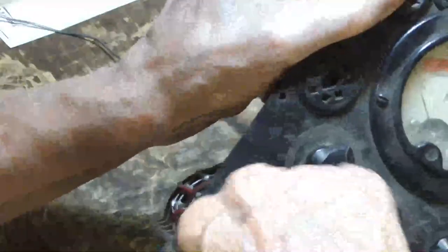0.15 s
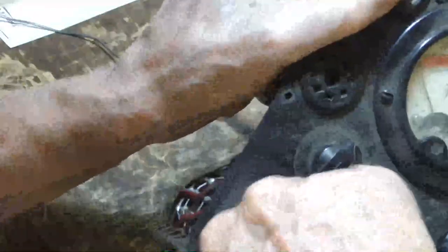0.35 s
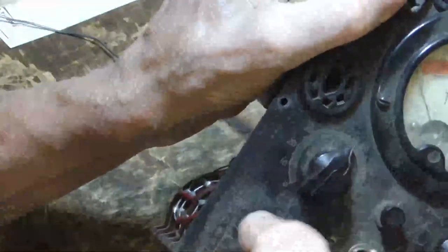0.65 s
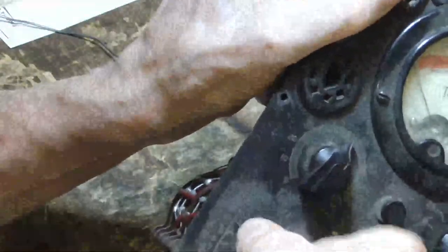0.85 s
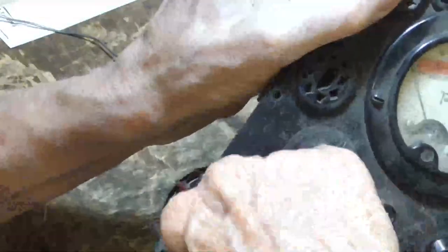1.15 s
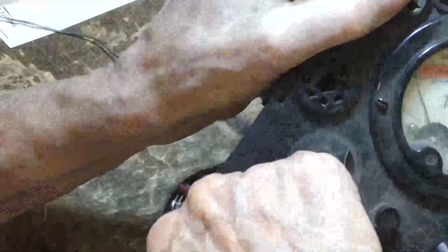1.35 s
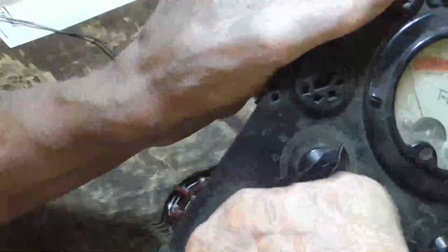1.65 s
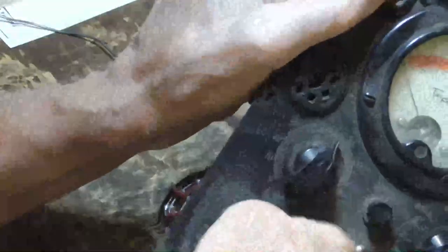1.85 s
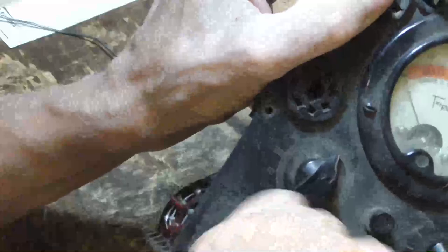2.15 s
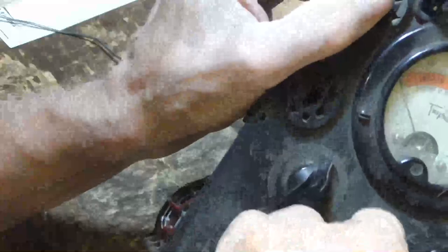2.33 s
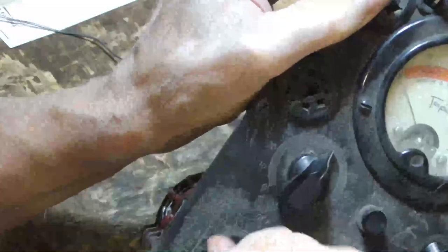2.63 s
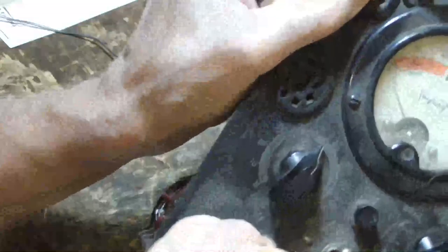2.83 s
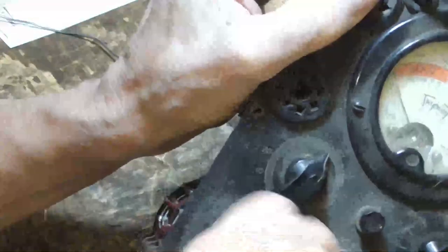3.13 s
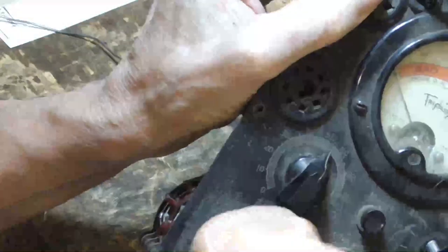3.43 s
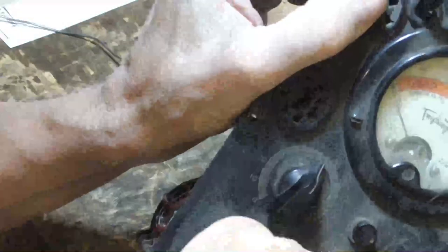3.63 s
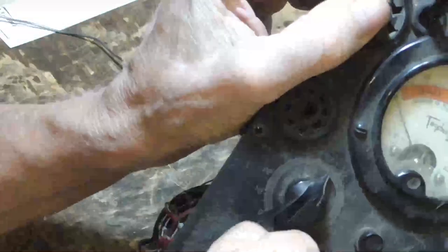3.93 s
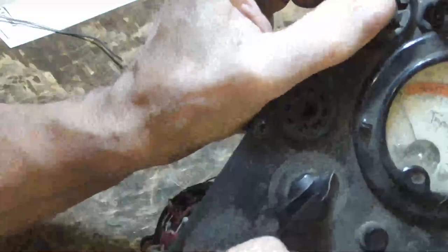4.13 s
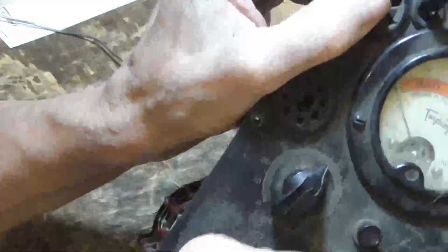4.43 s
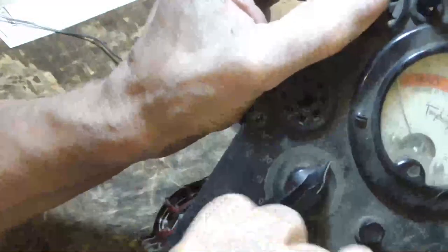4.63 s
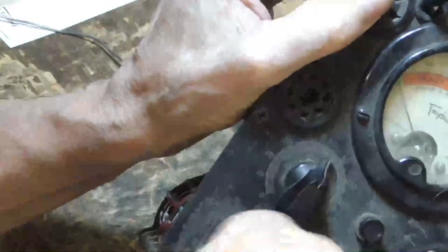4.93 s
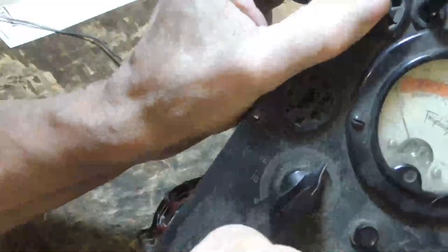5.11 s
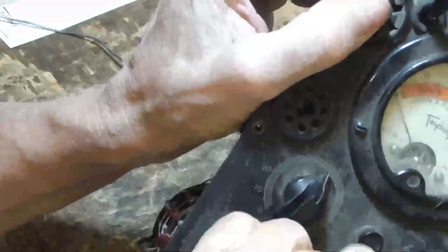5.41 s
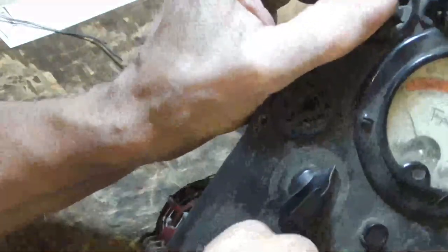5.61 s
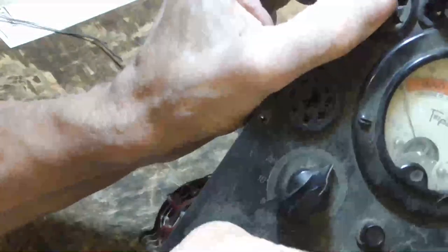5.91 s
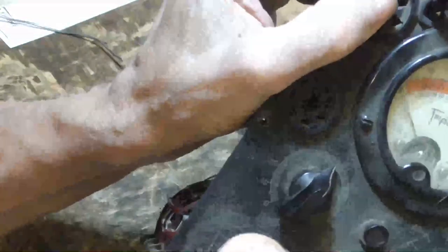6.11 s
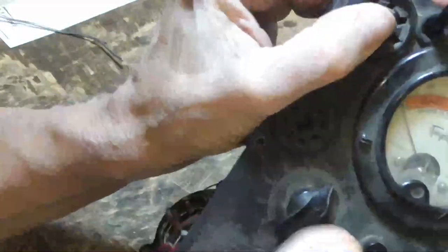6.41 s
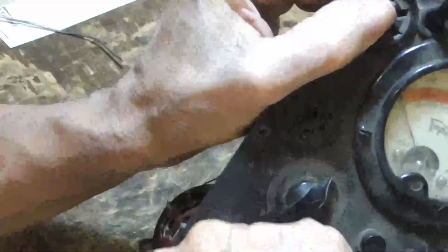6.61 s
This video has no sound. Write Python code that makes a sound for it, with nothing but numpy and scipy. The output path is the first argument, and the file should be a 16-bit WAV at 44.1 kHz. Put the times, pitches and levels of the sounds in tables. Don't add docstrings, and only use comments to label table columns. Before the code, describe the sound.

A stiff rotary switch is spun in nine short bursts of bright metallic clicks, over a steady low motor hum and soft air rush.

```python
import sys
import numpy as np
from scipy import signal
from scipy.fft import rfft, irfft, next_fast_len
from scipy.io import wavfile
from scipy.ndimage import uniform_filter1d, map_coordinates

SR = 44100
rng = np.random.default_rng(int(sys.argv[2]) if len(sys.argv) > 2 else 0)


def waveform_to_disk(signal):
    frames = np.transpose(np.atleast_2d(signal))
    scaled = np.clip(frames, -1, 1) * 32767
    samples = np.round(scaled).astype(np.int16)
    wavfile.write(sys.argv[1], SR, samples)


def nominal_scale(level):
    x = np.asarray(level, float) / 20
    return 10 ** x


N = 298116


def unit(x):
    return x / np.sqrt(np.mean(x ** 2) + 1e-20)


def along(points, hz):
    f, value = np.transpose(points)
    return np.interp(np.log(hz + 1), np.log(f + 1), value)


def wobble(rate):
    coarse = np.arange(0, N + 64, 64)
    knots = rng.standard_normal(int(N * 40 / SR))
    curve = map_coordinates(knots, [coarse * min(rate, 30) / SR])
    return np.interp(np.arange(N), coarse, curve)


def filtered(x, response):
    m = next_fast_len(N + SR // 2)
    hz = np.fft.rfftfreq(m, 1 / SR)
    return irfft(rfft(x, m) * response(hz), m)[..., :N]


def modes(table, scatter_db=0):
    gains = nominal_scale(np.transpose(table)[2] + scatter_db * rng.standard_normal(len(table)))

    def response(hz):
        total = 0
        for k, (centre, width, _) in enumerate(table):
            damping = 1j * hz * width
            total = total + (-1) ** k * gains[k] * damping / (centre ** 2 - hz ** 2 + damping)
        return total

    return response


SHAFT_HZ = 57.74
# multiple, level_db
HUM = [(1, -58.5), (2.06, -57), (3, -44), (4, -41), (5, -57.5), (6, -48.5), (7, -57.5), (8, -57), (9, -64),
       (11, -57.5), (13, -60), (16, -53.5), (18, -57), (21.8, -57)]
# time_s, level_db
FOURTH = [
    (0.0, -44),
    (0.43, -39.5),
    (2.01, -41.5),
    (2.65, -44),
    (5.08, -44),
    (5.55, -42.5),
    (5.78, -47),
    (6.76, -44),
]


def motor():
    t = np.arange(N) / SR
    lines = []
    for k, db in HUM:
        strength = nominal_scale(db + 2.0 + (1.37 + 0.078 * k) * wobble(12))
        drift = 0.037 * k * wobble(8) + 0.0034 * k * k * wobble(25)
        start_phase = 7 * rng.random()
        lines.append(strength * np.sin(2 * np.pi * SHAFT_HZ * k * t + drift + start_phase))
    s, db = np.transpose(FOURTH)
    lines[3] = lines[3] * nominal_scale(np.interp(t, s, db - np.mean(db)))
    return sum(lines) * nominal_scale([[-.3], [.3]])


AIR_DB = -35
# pitch_hz, level_db (per Hz)
AIR = [(30, -30), (90, -15.5), (130, -12), (200, -2), (300, 0.5), (430, -9), (800, -5.5), (1300, -13),
       (1500, -18), (1800, -25.5), (2800, -31), (4800, -33), (6300, -39.5), (8000, -33.5), (15500, -47.5)]
# pitch_hz, likeness (0 to 1)
ALIKE = [(60, 0.43), (130, 0.99), (290, 0.9), (640, 0.75), (1410, 0.56), (3100, 0.42), (6820, 0.33),
         (15000, 0.04)]


def air():
    def shared_and_opposed(hz):
        angle = np.arccos(np.clip(along(ALIKE, hz), -1, 1)) / 2
        return nominal_scale(along(AIR, hz)) * [np.cos(angle), np.sin(angle)]

    shared, opposed = filtered(rng.standard_normal((2, N)), shared_and_opposed)
    level = nominal_scale(AIR_DB - 4 + 0.67 * wobble(3.05))
    return level * unit(np.array([shared + opposed, shared - opposed]))


# time_s (when the ball lands), level_db,
# lead_in_ms (slip before the landing), chatter_ms
TURN_1 = [(0.0487, -14, 3.8, 1.4), (0.0931, -24.0, 1.5, 1.9), (0.1048, -21, 1.8, 4.3),
          (0.1394, -15.5, 1.5, 1.9), (0.1537, -21, 1.3, 6.9), (0.1634, -16, 1.3, 1.0),
          (0.175, -11, 0.69, 1.7), (0.1919, -22, 1.5, 3.3), (0.2102, -21, 2.8, 7.0),
          (0.2147, -24, 3.9, 2.3), (0.2318, -28, 1.9, 1.1), (0.2383, -15.5, 1.4, 2),
          (0.2647, -36, 2.7, 6.3), (0.2779, -15, 1.5, 2.2), (0.3165, -45, 2.7, 5.7),
          (0.3525, -27, 1.7, 1.3), (0.372, -17.5, 1.8, 3.2)]
TURN_2 = [(0.9651, -22.5, 1.7, 2.2), (0.969, -16.0, 1.0, 3.8), (0.9997, -34, 3.1, 6.7),
          (1.0104, -16.5, 1.7, 4.1), (1.0644, -15, 2.1, 2.1), (1.09, -20.0, 2.9, 3.6),
          (1.1088, -21, 0.87, 1.2), (1.1132, -18.0, 2.7, 1.7), (1.1332, -25, 1.7, 3.4),
          (1.139, -18, 0.9, 1.4), (1.1656, -27, 3.4, 4.1), (1.1768, -19.5, 1.5, 2), (1.2001, -24, 1, 1.8),
          (1.211, -19.5, 1, 2.7), (1.2309, -28.5, 1.3, 2.1), (1.2429, -19, 0.8, 1.6),
          (1.313, -39, 1.2, 3.6), (1.3336, -25.5, 0.9, 3.5)]
TURN_3 = [(1.7715, -29, 2, 3.6), (1.7805, -23.5, 0.9, 5.8), (1.8086, -33, 3.8, 6.2),
          (1.8222, -30, 3.9, 5.0), (1.8446, -30, 2.7, 5.7), (1.8567, -26.5, 1.2, 4.6),
          (1.874, -24.5, 4.5, 1.0), (1.8802, -22.5, 1.9, 8), (1.8981, -21.5, 3.3, 5.6),
          (1.9107, -19.5, 1.3, 6.7), (1.929, -19, 5.0, 3.2), (1.9464, -18.5, 5, 2.3),
          (1.9725, -24, 2.3, 2.6)]
TURN_4 = [(2.6513, -45, 2.8, 5.1), (2.6638, -11.5, 1.8, 2.2), (2.684, -19, 0.7, 2.6),
          (2.7213, -13, 0.9, 1.4), (2.751, -38, 3.1, 4.1), (2.764, -17, 1.6, 3), (2.7948, -18, 1.1, 4.1),
          (2.8077, -33, 3.1, 1.0), (2.8224, -15, 0.9, 2), (2.85, -23.5, 5, 7.0), (2.869, -19.5, 1.4, 3.4),
          (2.8892, -20.5, 2.4, 6.9), (2.9133, -20, 1.2, 3)]
TURN_5 = [(3.3993, -14.5, 1.6, 1.5), (3.4297, -25, 5.4, 6.3), (3.476, -37, 3.1, 1.0),
          (3.483, -25, 1.0, 3.3), (3.5046, -36, 2.2, 5.7), (3.5148, -21, 1.3, 1.6), (3.5333, -35, 3.3, 6.5),
          (3.5376, -34, 2.9, 1.9), (3.5421, -28, 3.5, 6.2), (3.5616, -38, 3.1, 1.0),
          (3.5677, -23, 1.8, 4.6), (3.5874, -26, 3.1, 3.6), (3.6056, -21, 3.9, 1.5),
          (3.6217, -23.5, 3.8, 5.8), (3.6423, -23.5, 4, 3.0), (3.6807, -25, 0.8, 1.3)]
TURN_6 = [
    (4.2094, -12, 0.9, 1.6),
    (4.2389, -19, 1.1, 3.8),
    (4.27, -16.5, 1.4, 1.8),
    (4.3022, -19, 1.9, 2.1),
    (4.3166, -32, 3.1, 6.4),
    (4.3263, -18.5, 0.95, 3.2),
    (4.3446, -19, 1.2, 3.3),
    (4.3564, -20.5, 5.0, 2.9),
    (4.372, -16.5, 1.2, 2.8),
    (4.3899, -20, 0.92, 5.5),
]
TURN_7 = [(4.8847, -15.5, 1.2, 2.2), (4.9085, -27, 3.4, 1.0), (4.9142, -22.5, 2.8, 3.9),
          (4.939, -34, 2.6, 1.0), (4.9426, -27, 3.1, 1.0), (4.9503, -25.5, 1.2, 4.2),
          (4.9839, -32, 3.1, 3.0), (4.992, -20, 1.4, 1.1), (5.0168, -15, 1.3, 1.7), (5.0364, -20, 4.3, 3.1),
          (5.0539, -17.5, 3.4, 2.5), (5.069, -21.5, 5.4, 5.2), (5.0863, -14.5, 0.9, 2.4),
          (5.106, -20, 1.2, 3.4), (5.146, -24.5, 1.5, 2.6)]
TURN_8 = [(5.6903, -14.0, 1.3, 2.7), (5.719, -15.5, 1.4, 2.8), (5.7628, -15.5, 1.3, 1.6),
          (5.8045, -17.5, 0.8, 4.5), (5.829, -43, 3.1, 5.9), (5.8404, -14.5, 1.7, 1.2),
          (5.8804, -20, 0.9, 2.2), (5.9045, -35, 2.8, 0.89), (5.916, -15.5, 1, 1.6),
          (5.9497, -19.5, 1.3, 3.7), (5.9823, -21, 1.9, 3.1), (6.017, -21, 1.4, 3.9)]
TURN_9 = [(6.4658, -14, 3.3, 1.6), (6.4871, -26, 3.1, 1.0), (6.4956, -23.5, 3.5, 1.2),
          (6.522, -26.5, 1.3, 3.9), (6.5309, -22.5, 1.2, 3.1), (6.5537, -30, 4.2, 6.2),
          (6.5659, -17, 0.84, 1.7), (6.581, -17, 1.5, 4.1), (6.5951, -17, 1.0, 6.4),
          (6.6137, -18.5, 5.0, 3.1), (6.6278, -20, 4.4, 5), (6.651, -18.5, 3.8, 4.4)]
TURNS = [TURN_1, TURN_2, TURN_3, TURN_4, TURN_5, TURN_6, TURN_7, TURN_8, TURN_9]
# time_s, rocking_db, boom_db, scrape_db, panel_freedom_db (how freely it rings)
TWISTS = [
    (.16, -40, -37.5, -46, -2.5),
    (1.24, -36.5, -37, -56, -2),
    (1.94, -40, -34.5, -31, 1),
    (2.9, -39, -35, -33.5, 0.1),
    (3.6, -39, -34.5, -28, 2),
    (4.35, -44, -49, -37, -0.7),
    (5.05, -43, -33, -24.5, .3),
    (5.93, -49, -49, -38, 1),
    (6.6, -35, -42, -42, -0.2),
]


def snaps():
    return np.array([(*row, twist[-1]) for rows, twist in zip(TURNS, TWISTS) for row in rows])


# pitch_hz, width_hz, level_db
SPRING = [(7670, 2070, -4.5), (9900, 2580, 0.5), (12220, 2000, 0.5), (14800, 1100, -6.5)]
# pitch_hz, width_hz, level_db
PANEL = [(1355, 510, -6), (2240, 590, -4), (3420, 870, -1), (4670, 1000, 2), (5690, 2200, -6)]
PANEL_DB, PANEL_FOLLOWS, PANEL_SCATTER_DB = -30.5, 0.81, 3


def switch():
    t = np.arange(-400, 1136) / SR
    hz = np.fft.rfftfreq(len(t), 1 / SR)
    landing = np.exp(-(t / .00035) ** 2)
    out = np.zeros((3, N + SR))
    for s, db, lead_ms, chatter_ms, free_db in snaps():
        hits = rng.standard_normal((3, len(t))) * nominal_scale(3 * rng.standard_normal(len(t)))
        slip = np.clip(1 + 1000 * t / np.maximum(2.18 * lead_ms - .4, .2), 0, 1) ** 1.7
        chatter = slip * nominal_scale(-9000 * np.maximum(t, 0) / chatter_ms)
        force = .8 * chatter + .55 * landing
        spring = force * (0.89 * hits[0] + .5 * hits[1:])
        panel = force ** 0.43 * (0.68 * hits[0, ::-1] + 0.3 * hits[1:, ::-1])
        panel_db = PANEL_DB + free_db + PANEL_FOLLOWS * (db + 20)
        panel_db += PANEL_SCATTER_DB * rng.standard_normal()
        start = round(s * SR)
        for part, table, level_db in ((spring, SPRING, db - 2.5), (panel, PANEL, panel_db)):
            struck = rfft([*part, t == 0])
            ring = irfft(struck * modes(table, scatter_db=1.5)(hz))
            ring = np.array([*unit(ring[:2]), unit(ring[2])])
            strength = nominal_scale(level_db) * np.sqrt(np.mean(chatter ** 2))
            out[:, start:start + len(t)] += strength * ring
    return out[:, 400:N + 400]


# rocking, boom, scrape
# build-up towards the twist (dB per s)
BUILD_DB_PER_S = [145, 174, 150]
EASE_DB_PER_S = [113, 200, 198]
HELD_DB = [-53, -54.5, -55]
LET_GO_S = [0.085, .08, 0.062]
GRIP_S = .015


def turning(column):
    t = np.arange(N) / SR
    gain = np.zeros(N)
    for rows, (s, *top_db) in zip(TURNS, TWISTS):
        since_grip = t - rows[0][0] + GRIP_S
        until_release = rows[-1][0] + LET_GO_S[column] - t
        fade = np.clip(np.minimum(since_grip, until_release) / 0.054, 0, 1)
        loss_db = np.maximum(BUILD_DB_PER_S[column] * (s - t), EASE_DB_PER_S[column] * (t - s))
        gain += fade * (nominal_scale(top_db[column] - loss_db) + nominal_scale(HELD_DB[column]))
    return gain


def scrape():
    grit = unit(rng.standard_normal((3, N)) * nominal_scale(2.7 * rng.standard_normal(N)))
    rub = turning(column=2) * nominal_scale(5.4 * wobble(30)) * grit
    return filtered(rub, lambda hz: modes(SPRING)(hz) + .5 * modes(PANEL)(hz))


# pitch_hz, fade_s
SHOP = [(500, 0.36), (2500, 0.32), (6000, 0.34), (10000, 0.25), (13000, 0.15), (16000, 0.21)]


def shop(x):
    hop = 1764
    out = np.zeros((2, N + SR))
    hz, t, z = signal.stft(rng.standard_normal((8, 2, SR // 2)), SR, nperseg=256)
    fade = nominal_scale(-60 * t / along(SHOP, hz)[:, None])
    tails = signal.istft(z * fade, SR, nperseg=256)[1]
    tails = tails * (1 - np.exp(-np.arange(tails.shape[2]) / SR / 0.00067))
    for k, start in enumerate(range(0, N, hop)):
        wet = signal.fftconvolve(x[None, start:start + hop], tails[k % 8], axes=1)
        out[:, start:start + wet.shape[1]] += wet
    return out[:, :N] / np.linalg.norm(tails[0, 0])


def even(x):
    return x / np.sqrt(np.abs(uniform_filter1d(x ** 2, size=3500)) + 1e-12)


# pitch_hz, width_hz, level_db
ROCK = [(50.4, 40, -15), (81.4, 11, -11), (119.5, 15.3, 2.5), (145, 32, -6.5)]
# pitch_hz, width_hz, level_db
BOOM = [(190.5, 8.7, 6), (360, 20.5, -6.5), (452, 83, -15.5), (710, 170, -33)]


def chassis():
    kicks = np.zeros(N)
    s, db = snaps().T[:2]
    kicks[np.round(s * SR).astype(int)] = nominal_scale(0.34 * db)
    rock = even(filtered(kicks, modes(ROCK)))
    boom = even(filtered(kicks, modes(BOOM)))
    shake = even(filtered(rng.standard_normal(N), modes(ROCK)))
    tripod = 0.22 * np.outer([1, -1], shake)
    return nominal_scale(-3.0) * turning(column=0) * (rock + tripod) + nominal_scale(0.5) * turning(column=1) * boom


GLIDE_S, GLIDE_DB, GLIDE_HZ, GLIDE_SAG_HZ_PER_S = 1.945, -31, 119.4, 210
GLIDE_RISE_S, GLIDE_FALL_S = 0.04, 0.061


def glide():
    t = np.arange(N) / SR - GLIDE_S
    swell = np.exp(-(t / np.where(t < 0, GLIDE_RISE_S, GLIDE_FALL_S)) ** 2)
    cycles = GLIDE_HZ * t - GLIDE_SAG_HZ_PER_S * t * t / 2
    return nominal_scale(GLIDE_DB) * swell * np.sin(2 * np.pi * cycles)


# pitch_hz, left_minus_right_db
PORTS = [(3000, -1), (6000, 0), (9000, -2), (15000, -4)]
HOUSING_HZ, HOUSING_WIDTH_HZ, HOUSING_DB = 6370, 460, -1


def scene():
    background = motor() + air()
    clicks = switch() + scrape()
    echo = shop(clicks[2])
    echo = echo + filtered(echo[::-1], lambda hz: 0.62 / (1 + (hz / 4000) ** 2))
    near = clicks[:2] + nominal_scale(-3.5) * echo
    near = filtered(near, lambda hz: nominal_scale(np.outer([.5, -.5], along(PORTS, hz))))
    near = filtered(near, lambda hz: nominal_scale(HOUSING_DB * np.exp(-((hz - HOUSING_HZ) / HOUSING_WIDTH_HZ) ** 2)))
    return background + near + chassis() + glide()


def roll_off(x):
    return signal.sosfilt(signal.butter(12, 16640, fs=SR, output="sos"), x)


TOP_HZ = 15850


def record(dry):
    mix = filtered(dry, lambda hz: 1 / (1 + (hz / TOP_HZ) ** 120))
    return roll_off(mix)


dry = scene()
out = record(dry)
waveform_to_disk(out)
```